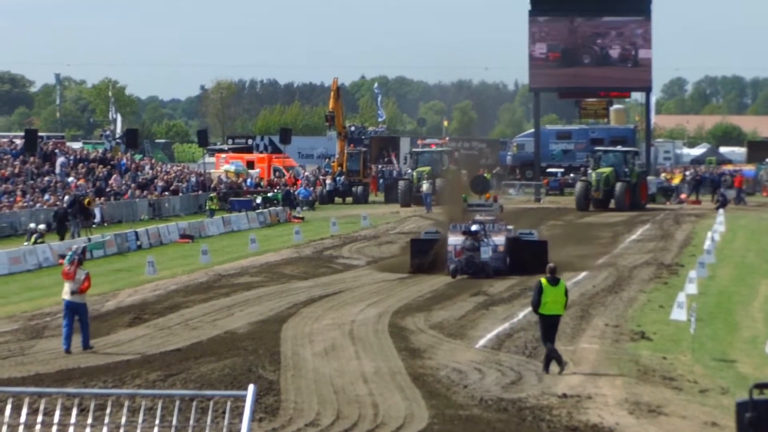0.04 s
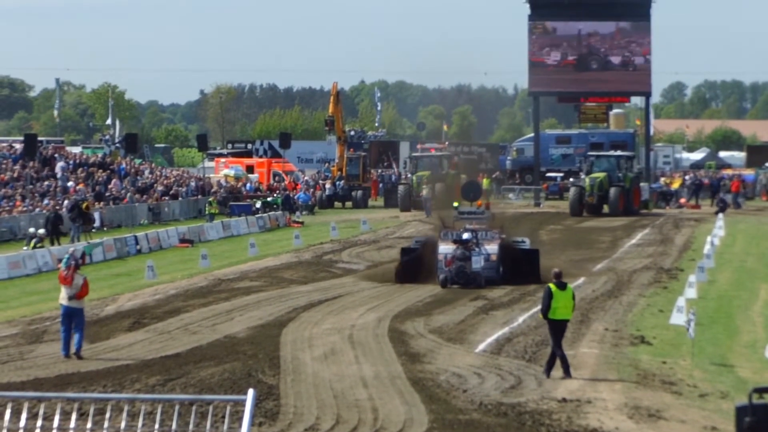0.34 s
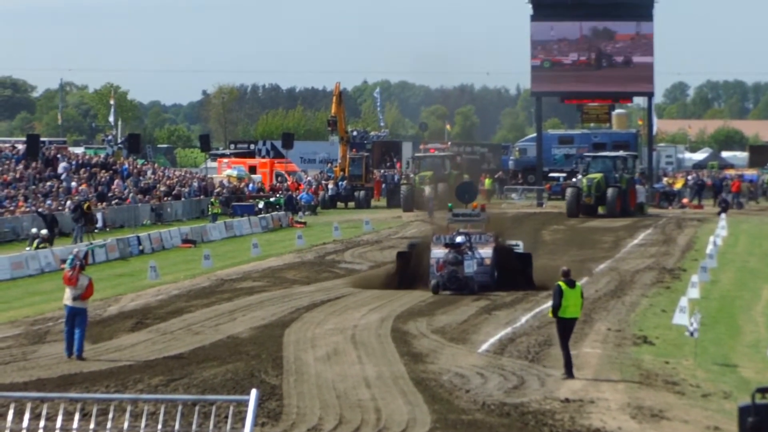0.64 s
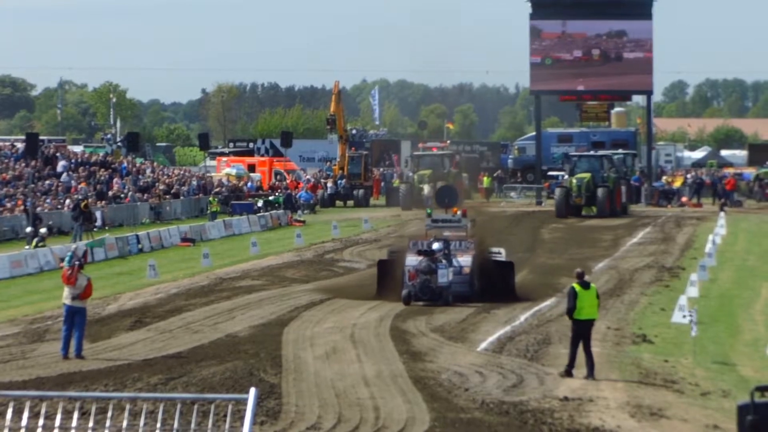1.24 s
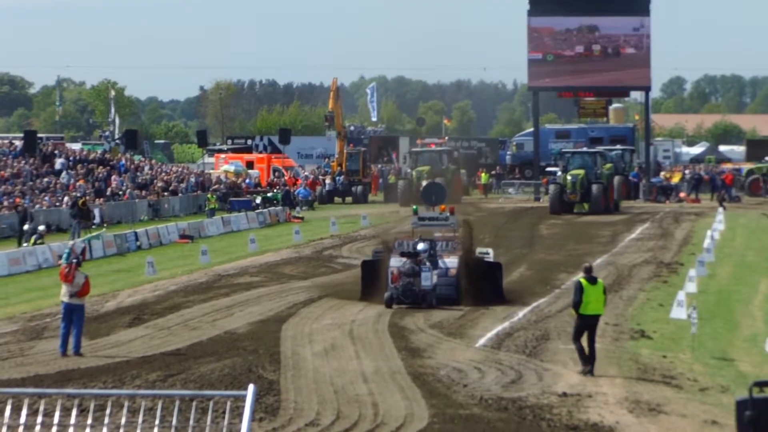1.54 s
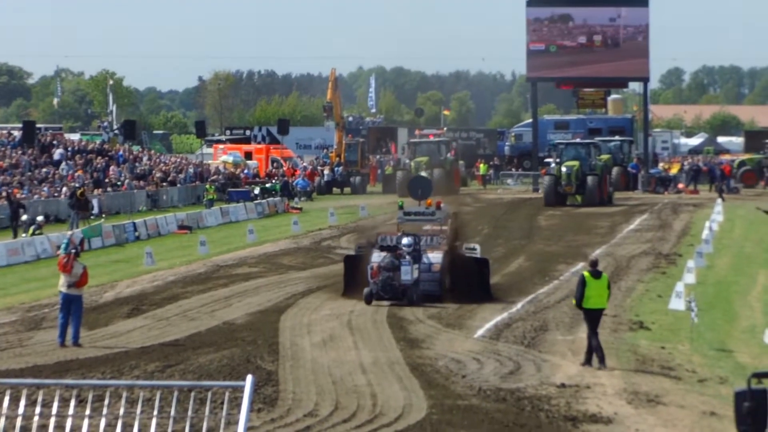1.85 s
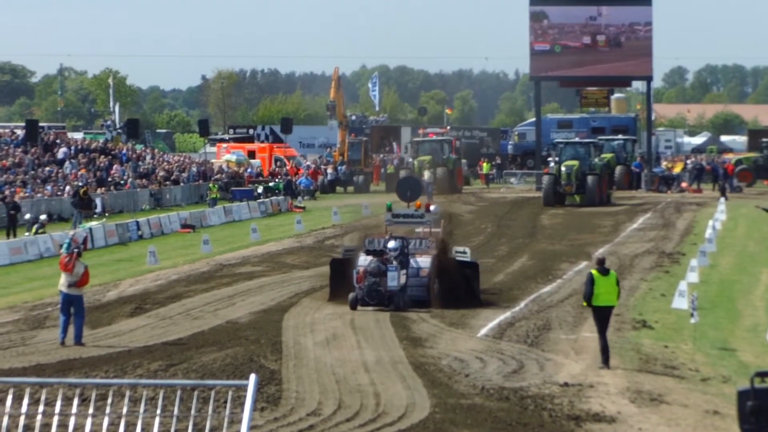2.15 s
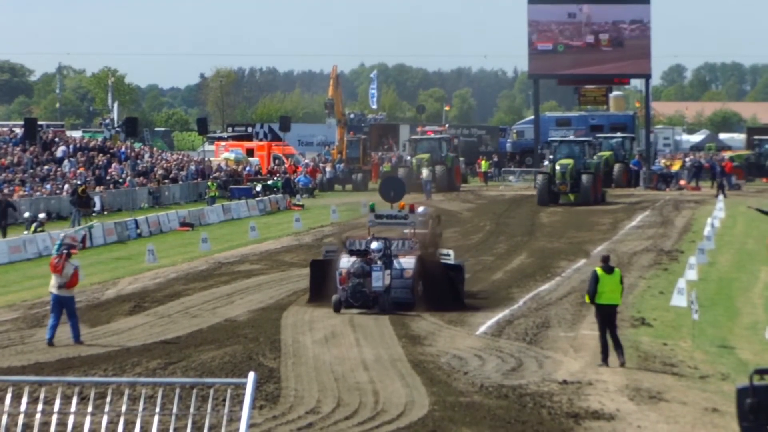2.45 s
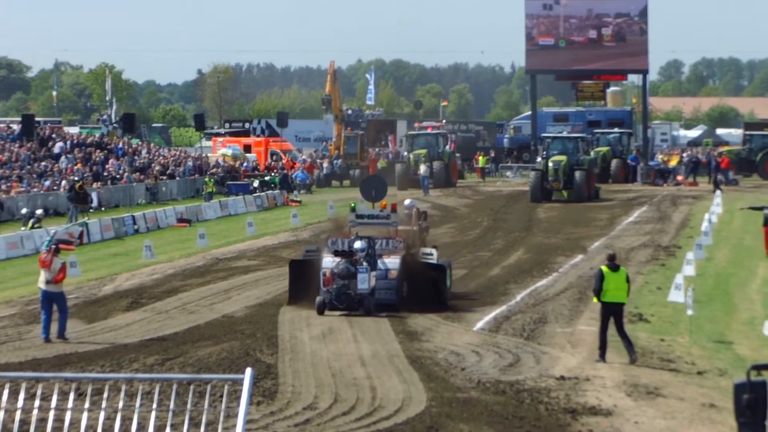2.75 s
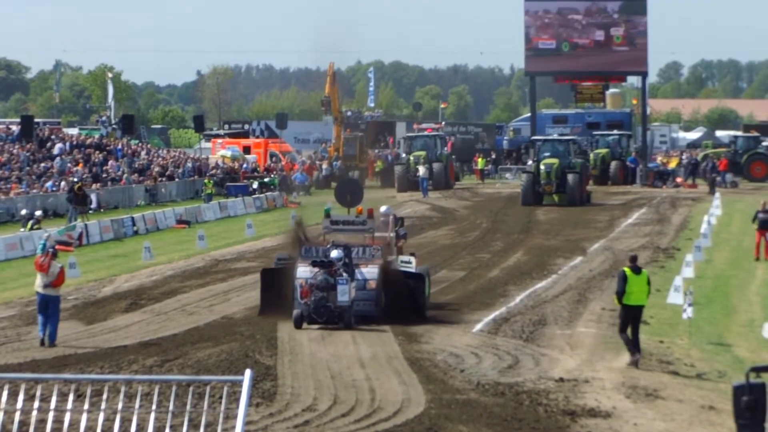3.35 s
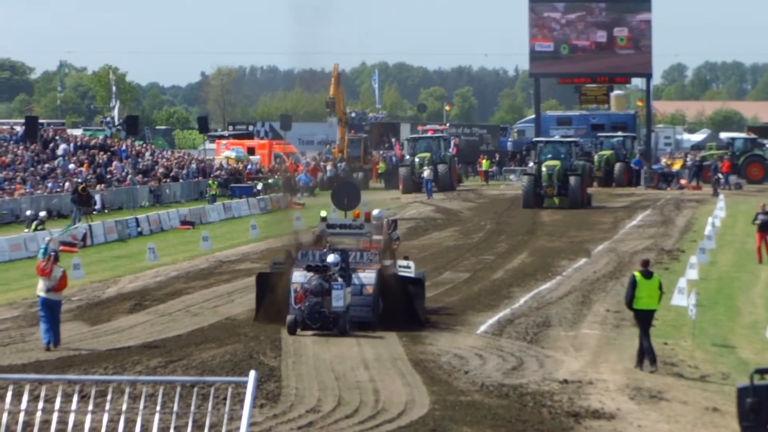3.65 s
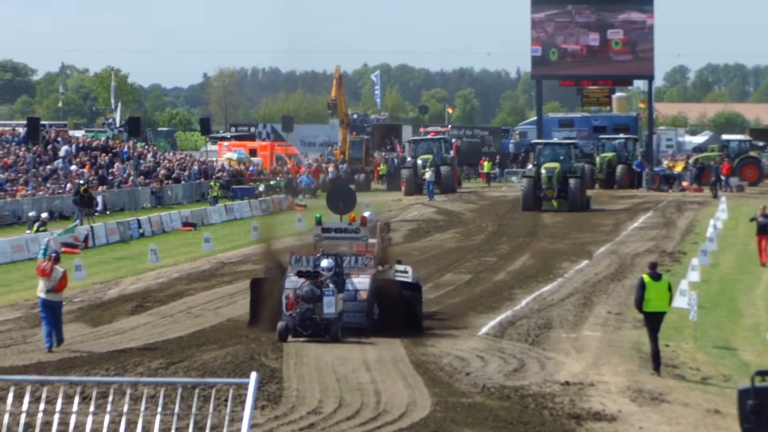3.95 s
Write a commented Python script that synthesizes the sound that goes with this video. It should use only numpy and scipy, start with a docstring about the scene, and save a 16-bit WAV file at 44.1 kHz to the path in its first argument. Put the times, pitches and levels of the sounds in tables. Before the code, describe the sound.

A pulling tractor roars at full throttle from the first moment, loud and harsh, its engines held at high, nearly constant revs. A high supercharger whine throbs rapidly over the rasping exhaust and a fine crackle. From about 1.2 seconds the roar turns fuller and brighter as the tractor approaches. The whine is stronger from around 2.4 seconds, and the sound drifts slightly left, continuing unbroken to 4 seconds.

```python
"""Pulling tractor on a dirt track

It comes toward a stereo pair at full throttle, its supercharged engines held near 7100 rpm.
Open exhausts give a stack of tones, a fine crackle and a hard roar that pulses with the firings;
two blowers whine and beat. The treble grows as it nears; the sheer level drives the recorder's limiter."""
import sys
import numpy as np
from scipy import signal
from scipy.io import wavfile
from scipy.ndimage import uniform_filter1d, minimum_filter1d

SR = 44100
rng = np.random.default_rng(int(sys.argv[2]) if len(sys.argv) > 2 else 0)


def master_out(mix):
    """Clip the mix to full scale and print it as 16-bit PCM to the path in sys.argv[1]."""
    frames = np.transpose(np.atleast_2d(mix))
    ceiling = np.clip(frames, -1, 1)
    pcm = np.round(ceiling * 32767).astype(np.int16)
    wavfile.write(sys.argv[1], SR, pcm)


N = 176400

# engine speed: t/s, four-stroke cycle rate/Hz
CYCLE_RATE = [(0.0, 59.6), (0.19, 59.7), (0.28, 58.2), (0.4, 59.0), (0.65, 58.7), (1.04, 58.8),
              (1.15, 58.4), (1.55, 59.1), (2.52, 59.6), (2.6, 59.2), (2.73, 59.7), (2.94, 58.9),
              (3.11, 58.9), (3.31, 59.6), (3.65, 59.2), (3.75, 60.0), (3.97, 59.2), (4.0, 58.7)]
# the eight cylinders in firing order: level/dB
CYLINDER_LEVELS = [0, -4, 2, -1, -3, 1, 1, -4]
# distance from the microphones: t/s, nearness (0 far, 1 near)
APPROACH = [(0, 0.19), (.9, 0.032), (1.7, 0.75), (2.6, 0.77), (4, 1)]
# exhaust tones far off and close by: multiple of the cycle rate, relative level/dB
FAR_TONES = [(1, -53), (2, -37), (3, -42.5), (4, -39), (5, -32.5), (6, -30), (7, -24.5), (8, -19.5),
             (9, -9.5), (10, -8.5), (11, -10.5), (12, -8), (13, -8.5), (14, -8.5), (15, -7.5), (16, -3),
             (17, 0.5), (18, -1), (19, -1), (20, -7), (21, 3), (22, -0.5), (23, -9.5), (24, -18.5),
             (25, -2), (26, -6.5), (27, -10), (28, 1), (29, -6), (30, 0), (31, -7), (32, -13.5), (33, -5),
             (34, -3), (35, -32), (36, -20)]
NEAR_TONES = [(1, -57.5), (2, -39.5), (3, -31.5), (4, -44), (5, -21), (6, -25), (7, -17), (8, -20),
              (9, -13.5), (10, -9.5), (11, -6.5), (12, -4), (13, -12), (14, -8.5), (15, -10.5), (16, -29),
              (17, -4.5), (18, -6), (19, -7), (20, -2.5), (21, -7), (22, -6.5), (23, -7), (24, -9),
              (25, -3), (26, -4), (27, -18), (28, -2.5), (29, 4), (30, -2.5), (31, -3), (32, -13), (33, 2),
              (34, -3), (35, -5.5), (36, -19)]
# spectrum of the exhaust roar: f/Hz, relative density/dB
ROAR_SPECTRUM = [(30, -40), (100, -50), (250, -38), (370, -30.5), (480, -19), (750, -15), (1000, -8.5),
                 (1400, -3), (1800, -0.5), (2400, 2), (3050, -0.5), (3500, -9), (3950, -16), (4500, -8.5),
                 (5100, -7.5), (7300, -14), (9300, -14.5), (11000, -19), (12700, -25.5), (16000, -28)]
# how five ranges of the exhaust swell, each taken about its own mean: t/s, level/dB
BASS_SWELL = [(0, -1), (.9, -1.5), (1.25, -2.5), (1.6, -2), (2.2, -1.5), (2.7, -0.5), (4, -1.5)]
DRONE_SWELL = [(0.0, -23), (0.04, -18), (0.05, -21.5), (0.36, -20.5), (0.39, -21.5), (0.72, -25),
               (1.58, -23.5), (2.26, -23.5), (2.76, -25.5), (4.0, -25.5)]
MID_SWELL = [(0.0, -25.5), (0.36, -22), (0.39, -24.5), (0.78, -20), (1.15, -21), (1.24, -17), (1.84, -16.5),
             (2.19, -20.5), (2.21, -18.5), (3.04, -18), (3.99, -19.5), (4.0, -14)]
ROAR_SWELL = [(0.0, -12), (0.01, -11.5), (0.41, -11), (1.07, -10.5), (1.08, -12.5), (1.27, -11),
              (1.37, -11.5), (1.59, -10.5), (1.65, -13), (2.57, -9), (3.83, -11.5), (4.0, -11.5)]
TREBLE_SWELL = [(0.0, -19.5), (0.3, -21), (0.48, -23), (0.77, -21.5), (0.93, -23), (1.18, -16),
                (1.6, -17.5), (1.67, -21), (1.8, -17), (1.95, -15), (2.18, -18.5), (3.5, -16), (3.83, -18),
                (4.0, -16.5)]
# centres of bass, drone, midrange, lower roar, upper roar and treble: f/Hz
SWELL_CENTRES = [200, 650, 1200, 1800, 3000, 4600]
# shifting midrange hollow, likely the ground echo cancelling the direct sound: t/s, f/Hz, depth/dB
MID_HOLLOW = [(0, 690, 6), (.6, 690, 5.5), (1.3, 650, -2.5), (1.7, 1150, 2), (2.1, 1250, 4), (2.6, 1050, 0),
              (2.9, 850, 4.5), (4, 850, 3)]
# whine of the first blower: t/s, level/dB
BLOWER_LEVEL = [(0, -24), (.7, -19.5), (1.3, -24), (1.7, -23), (2.4, -17), (2.8, -20), (3.3, -16.5),
                (4, -19)]
# pitch gap between the blowers: t/s, f/Hz
BLOWER_GAP = [(0, 8.87), (2.9, 8.87), (3.1, 8.15), (4, 8.3)]
# balance at the microphones: f/Hz, left minus right level/dB
MIC_BALANCE = [(30, -11), (60, 1), (200, -4.5), (450, 1.5), (1200, 2), (1800, -.7), (2250, -2),
               (2650, -9.5), (3200, -9.5), (4000, 2.5), (5200, 1.2), (8000, -3.5), (11000, 1.5),
               (15000, -2)]
# likeness of the roar at the two microphones: f/Hz, coherence (0 to 1)
MIC_COHERENCE = [(50, .05), (130, .3), (300, 0.39), (500, 0.87), (1200, 0.76), (2000, 0.89), (2800, 0.79),
                 (3300, 0.39), (3700, 0.13), (4500, 0.67), (5500, 0.54), (9000, 0.52), (15000, 0.24)]
# later arrival at the left microphone: f/Hz, lag/s
MIC_LAG = [(400, 0.000027), (1200, 0.000052), (1800, 0.000051), (2300, 0.000064), (2900, 0.000041),
           (5500, 0.000021), (9000, 0.0000032)]

CRACKS_PER_S, CRACK_SPREAD_DB, CRACKLE_HZ, CRACKLE_DB = 350, 4.0, 10000, -37
BLOWER_ORDER, SECOND_BLOWER_DB, WHINE_WAVER, BEAT_START_S = 38, -2.5, .15, .04
THROB_ROAR_DB, THROB_TREBLE_DB = 0.46, 0.45   # in step with the blowers' beat
TONES_DB, TONES_FADE_HZ, FADE_DB_PER_OCTAVE = -24, 1300, -5.5   # higher up, tones give way to roar
WAVER_PER_KHZ, WAVER_HZ = 0.28, 7.7   # depth and speed of a tone's wavering
FIRING_SPREAD_DB, FIRING_DECAY, PULSE_SHARE = -1, 0.64, 0.46   # decay in firing intervals
ROAR_DB, FLICKER_DB, HOLLOW_OCTAVES = -9.5, 1.0, 0.19
AIR_DB_PER_S, AIR_HZ = 1.6, 13400   # the highest treble comes through as the distance shrinks
BRIGHT_DB_PER_S, BRIGHT_HZ = 1, 1920   # the heart of the roar swells on the way
PAN_DB_PER_S, WHINE_PAN_DB_PER_S = 0.63, -0.1   # the tractor drifts left, its whine a little less


def from_db(db):
    """Decibels to gain."""
    return 10 ** (np.asarray(db) / 20)


def rms_one(x):
    """Scale to unit rms."""
    return x / np.sqrt(np.mean(x ** 2) + 1e-20)


def seconds():
    """Time of every sample."""
    return np.arange(N) / SR


def ramp(per_s):
    """A steady change that passes zero halfway through the scene."""
    t = seconds()
    return per_s * (t - t.mean())


def in_time(rows):
    """A curve read at every sample."""
    return np.interp(seconds(), *np.transpose(rows))


def at_hz(points, hz):
    """A spectrum read on a log-frequency axis."""
    f, value = np.transpose(points)
    return np.interp(np.log(hz), np.log(f), value)


def drift(corner_hz, step=40):
    """Slow random wander of unit rms."""
    pole = np.exp(-2 * np.pi * corner_hz * step / SR)
    noise = rng.standard_normal(N // step + 2002)
    slow = signal.lfilter([1], [1, -2 * pole, pole * pole], noise)[2000:]
    return np.interp(np.arange(N) / step, np.arange(len(slow)), rms_one(slow))


def pan(db):
    """Left and right gain, the left louder by db."""
    return from_db(db * np.array([[.5], [-.5]]))


def mic_gains(hz):
    """Gain at each microphone for one frequency."""
    gains = pan(at_hz(MIC_BALANCE, hz))
    return gains / gains.mean()


def swell_db(swings, hz):
    """Level swing at one frequency: a blend of the neighbouring ranges, less the hollow."""
    place = np.interp(np.log(hz), np.log(SWELL_CENTRES), np.arange(len(swings)))
    blend = sum((1 - abs(place - k)) * swing for k, swing in enumerate(swings) if abs(place - k) < 1)
    hollow = [(t, depth * np.exp(-(np.log2(hz / centre) / HOLLOW_OCTAVES) ** 2))
              for t, centre, depth in MID_HOLLOW]
    return blend - in_time(hollow)


def tone(turns, hz, waver):
    """A tone reaches both microphones, its strength and phase wavering in the hot, moving air."""
    wander = 1 + waver * (drift(WAVER_HZ) + 1j * drift(WAVER_HZ))
    right = np.exp(2j * np.pi * turns) * wander / np.sqrt(.5 + waver ** 2)
    left = right * np.exp(-2j * np.pi * hz * at_hz(MIC_LAG, hz))
    return mic_gains(hz) * np.array([left.real, right.real])


def firings(cycles):
    """Gas flow: each cylinder lets out a dying puff of its own strength, on top of a steady stream."""
    cylinders = len(CYLINDER_LEVELS)
    count, age = np.divmod(cycles * cylinders, 1)
    count = count.astype(int)
    scatter_db = FIRING_SPREAD_DB * rng.standard_normal(4000)[count]
    strength = from_db(np.array(CYLINDER_LEVELS)[count % cylinders] + scatter_db)
    puffs = rms_one(strength * np.exp(-age / FIRING_DECAY))
    return np.sqrt(1 - PULSE_SHARE + PULSE_SHARE * puffs ** 2)


def crackle(cycles, treble_db):
    """The strongest puffs steepen into tiny shock fronts, which carry better as the tractor nears."""
    onsets = rng.random(N) < CRACKS_PER_S * firings(cycles) ** 2 / SR
    sizes = from_db(CRACK_SPREAD_DB * np.minimum(rng.exponential(1, (2, N)), 3))
    signs = rng.choice([-1, 1], N)
    highpass = signal.butter(2, CRACKLE_HZ, "high", fs=SR, output="sos")
    cracks = rms_one(signal.sosfilt(highpass, onsets * sizes * signs + 1e-18))
    return from_db(CRACKLE_DB + treble_db + ramp(AIR_DB_PER_S)) * cracks


def beat_turns():
    """Turns of phase that one blower's whine has gained on the other's."""
    return np.cumsum(in_time(BLOWER_GAP)) / SR - BLOWER_GAP[0][1] * BEAT_START_S


def blowers(cycles):
    """Two superchargers at almost the same pitch throb against each other."""
    turns, slip = BLOWER_ORDER * cycles, beat_turns()
    hz = turns[-1] * SR / N
    first = tone(turns - slip / 2, hz, WHINE_WAVER)
    second = from_db(SECOND_BLOWER_DB) * tone(turns + slip / 2, hz, WHINE_WAVER)
    return from_db(in_time(BLOWER_LEVEL)) * pan(ramp(WHINE_PAN_DB_PER_S)) * (first + second)


def exhaust_tones(cycles, swings):
    """The firing pattern sounds on each multiple of the cycle rate; the mix shifts with distance."""
    out, near = np.zeros((2, N)), in_time(APPROACH)
    for (order, far_db), (_, near_db) in zip(FAR_TONES, NEAR_TONES):
        hz = order * cycles[-1] * SR / N
        fade_db = FADE_DB_PER_OCTAVE * max(0, np.log2(hz / TONES_FADE_HZ))
        db = TONES_DB + far_db + near * (near_db - far_db) + fade_db + swell_db(swings, hz)
        out += from_db(db) * tone(order * cycles + rng.random(), hz, WAVER_PER_KHZ * hz / 1000)
    return out


def exhaust_roar(cycles, swings):
    """Turbulent gas pulses with the firings; each band has its own level and spread across the pair."""
    edges_hz = np.concatenate([np.geomspace(25, 400, 7)[:-1], np.geomspace(400, 17000, 29)])
    turbulence = rng.standard_normal((2, 2, N)) * firings(cycles)
    out, t = np.zeros((2, N)), seconds()
    for k, (low, high) in enumerate(zip(edges_hz, edges_hz[1:])):
        hz = np.sqrt(low * high)
        band = signal.butter(2, [low, high], "band", fs=SR, output="sos")
        mid, side = signal.sosfilt(np.vstack([band, band]), turbulence[k % 2])   # neighbours independent
        alike = at_hz(MIC_COHERENCE, hz)
        left, right = mic_gains(hz) * (np.sqrt(1 + alike) * mid + np.sqrt(1 - alike) * side * [[1], [-1]])
        late_left = np.interp(t - at_hz(MIC_LAG, hz), t, left)
        air = AIR_DB_PER_S * min(hz / AIR_HZ, 1) ** 4
        bright = BRIGHT_DB_PER_S * np.exp(-10 * np.log2(hz / BRIGHT_HZ) ** 2)
        flicker = FLICKER_DB * drift(corner_hz=6.3)
        db = at_hz(ROAR_SPECTRUM, hz) + swell_db(swings, hz) + ramp(air + bright) + flicker
        out += from_db(db) * np.array([late_left, right])
    return from_db(ROAR_DB) * rms_one(out)


def scene():
    """The tractor as heard from the trackside: one crankshaft speed drives every layer."""
    cycles = np.cumsum(in_time(CYCLE_RATE)) / SR
    swells = BASS_SWELL, DRONE_SWELL, MID_SWELL, ROAR_SWELL, TREBLE_SWELL
    bass, drone, mid, roar, treble = map(in_time, swells)
    throb = np.cos(2 * np.pi * beat_turns())
    levels = bass, drone, mid, roar, roar + THROB_ROAR_DB * throb, treble + THROB_TREBLE_DB * throb
    swings = [db - db.mean() for db in levels]
    exhaust = exhaust_tones(cycles, swings) + exhaust_roar(cycles, swings) + crackle(cycles, swings[-1])
    return (exhaust + blowers(cycles)) * pan(ramp(PAN_DB_PER_S))


def record(dry):
    """In the recorder a fast limiter holds the peaks, the rest clips, and the top is cut."""
    limit, window_s, ceiling, cutoff_hz = 1.1, 0.0013, 0.95, 16000
    width = int(window_s * SR)
    gain = limit / np.maximum(np.abs(dry).max(axis=0), limit)
    smooth_gain = uniform_filter1d(minimum_filter1d(gain, width), width)
    held = np.clip(dry * smooth_gain, -ceiling, ceiling)
    return signal.sosfilt(signal.ellip(10, .1, 60, cutoff_hz, fs=SR, output="sos"), held)


dry = scene()
out = record(dry)
master_out(out)
```